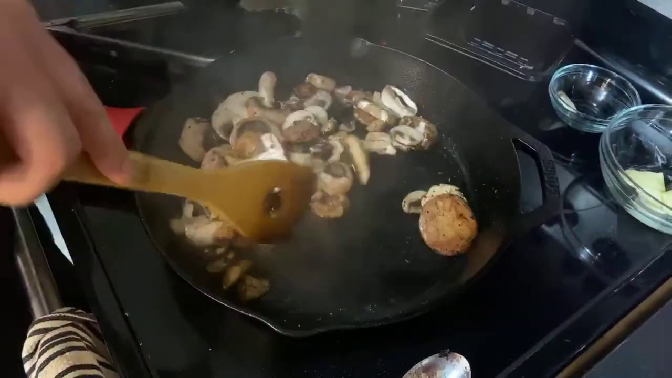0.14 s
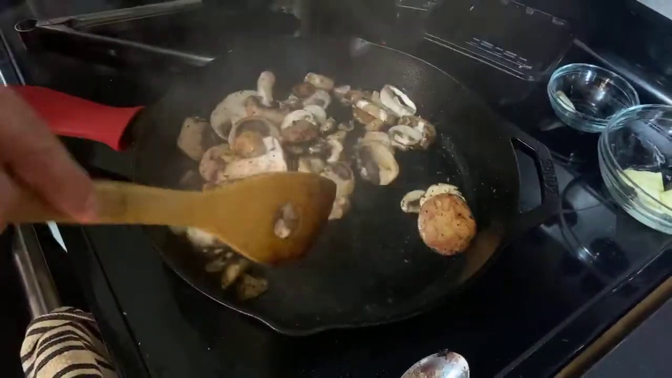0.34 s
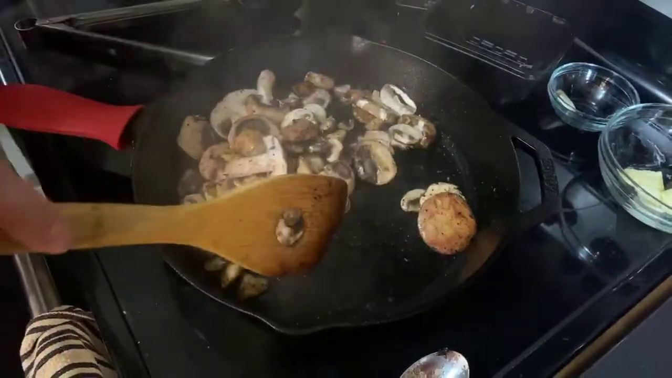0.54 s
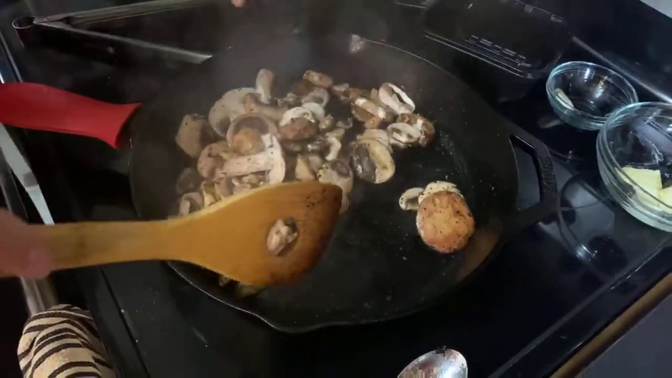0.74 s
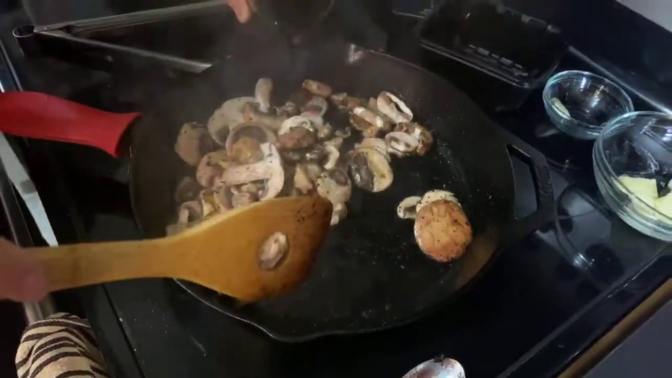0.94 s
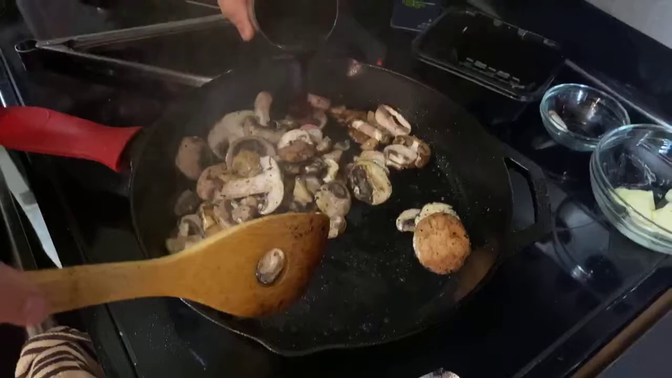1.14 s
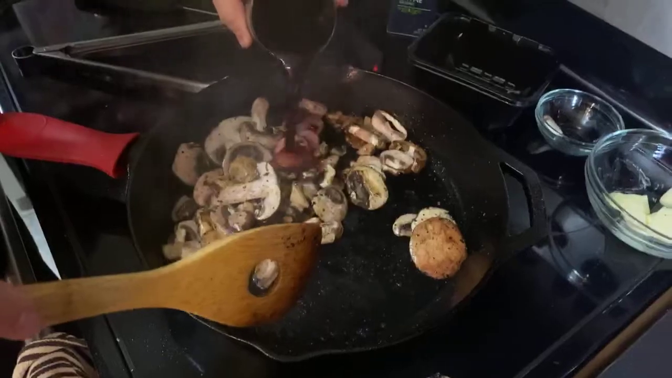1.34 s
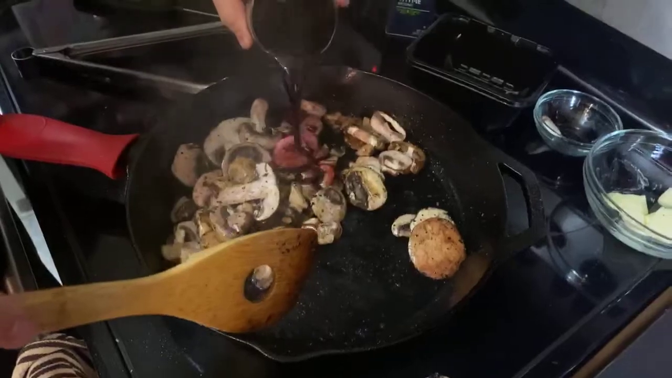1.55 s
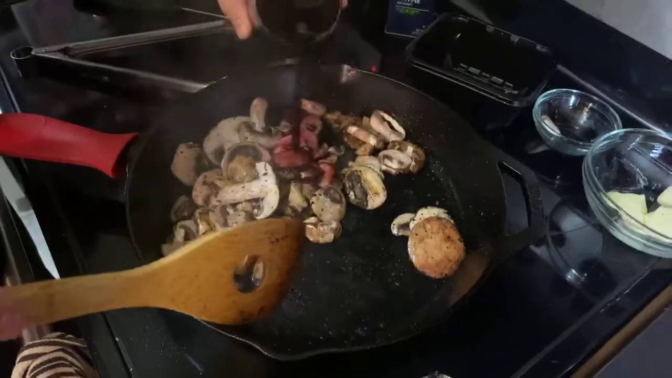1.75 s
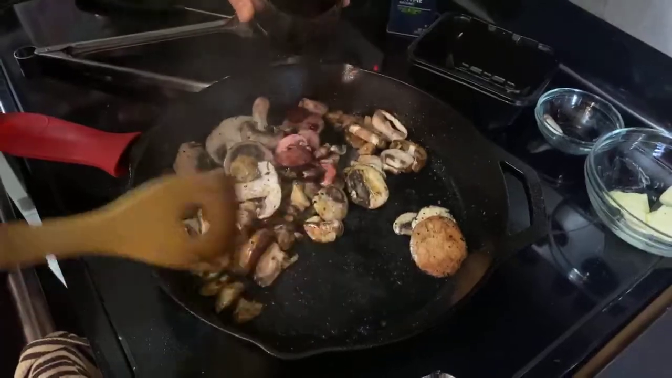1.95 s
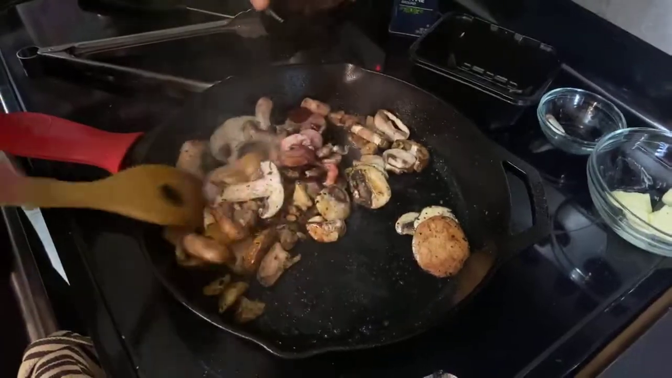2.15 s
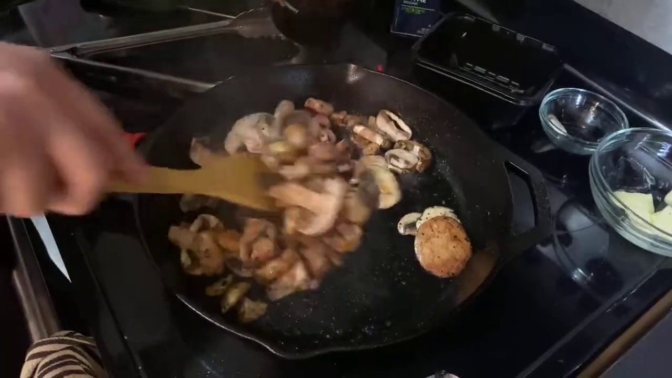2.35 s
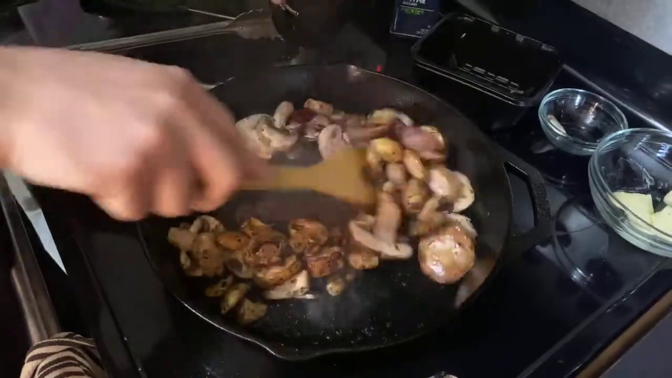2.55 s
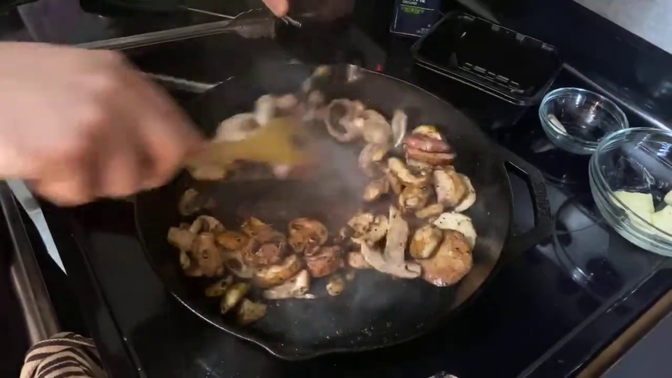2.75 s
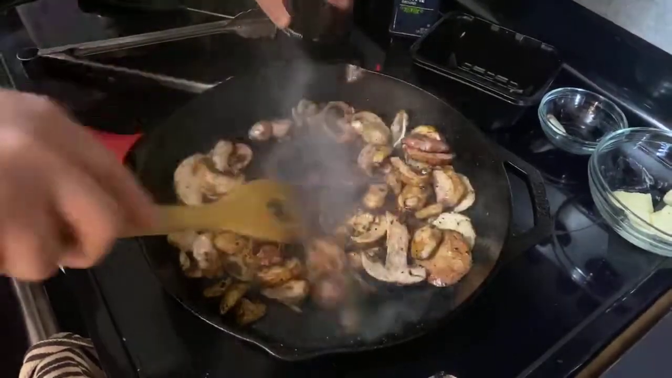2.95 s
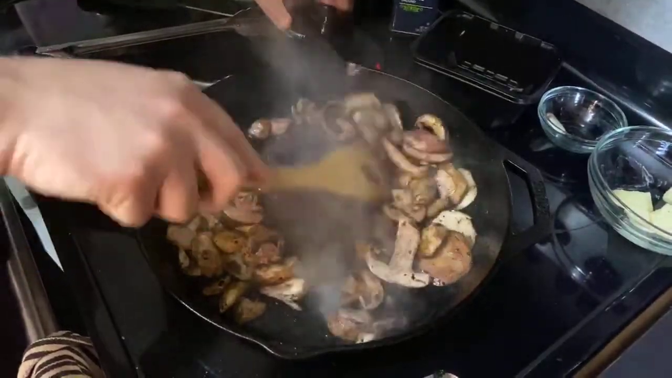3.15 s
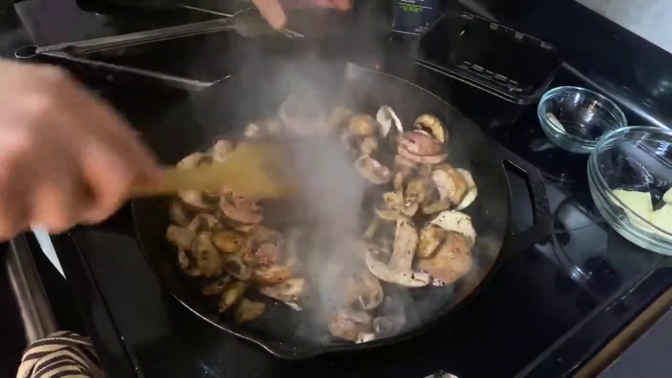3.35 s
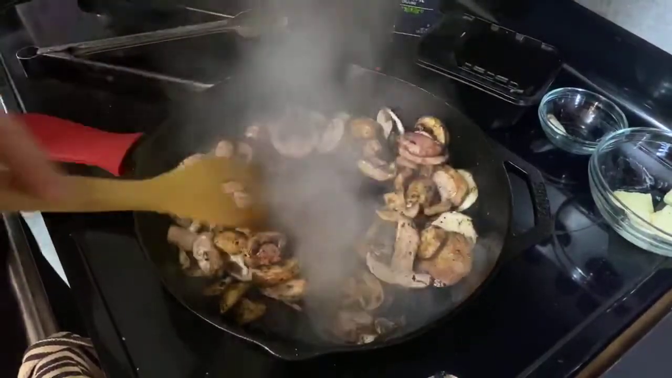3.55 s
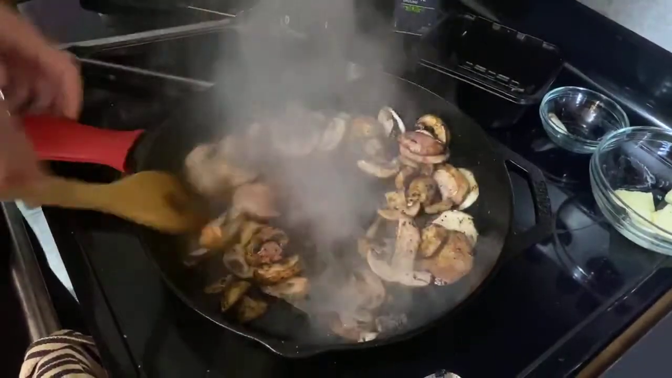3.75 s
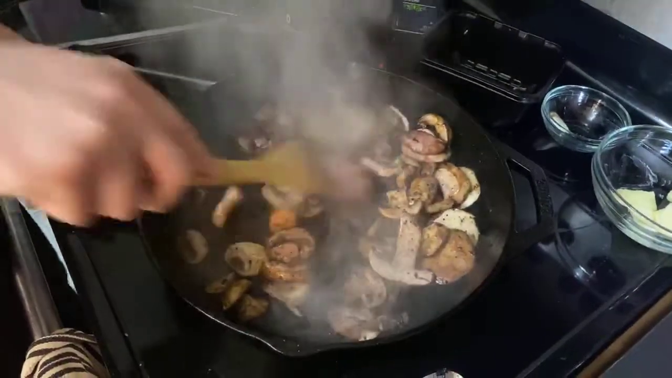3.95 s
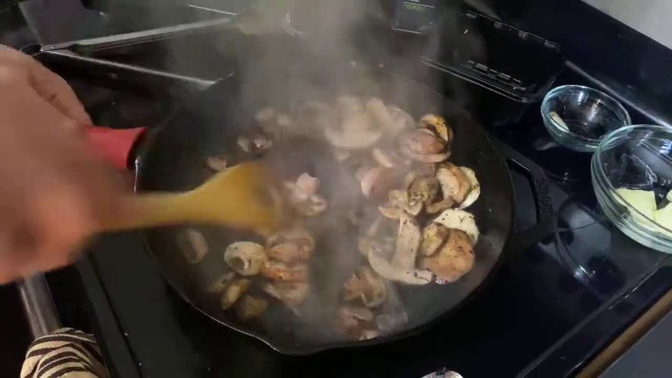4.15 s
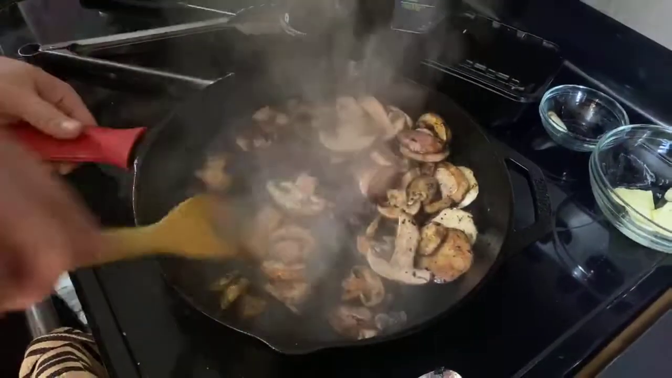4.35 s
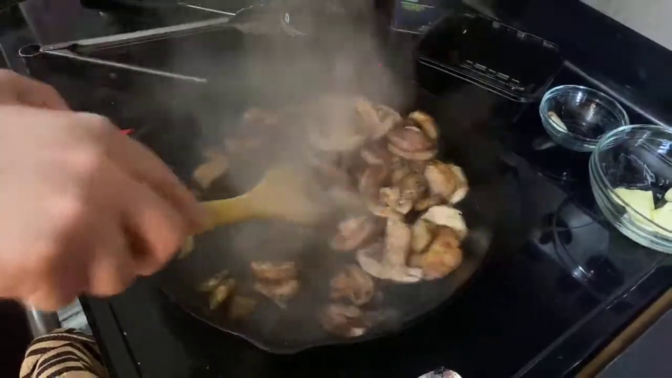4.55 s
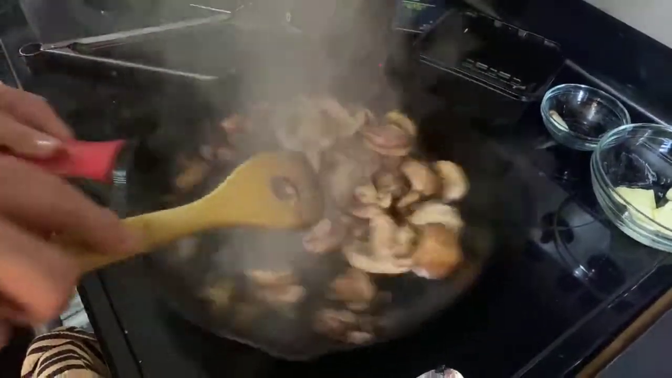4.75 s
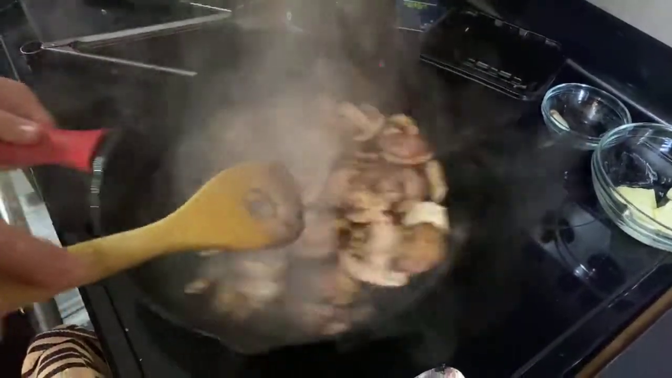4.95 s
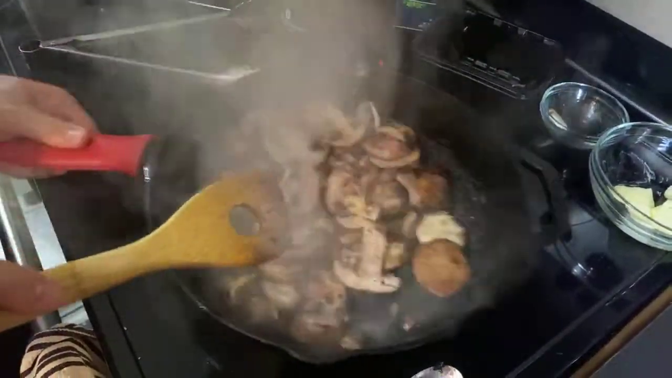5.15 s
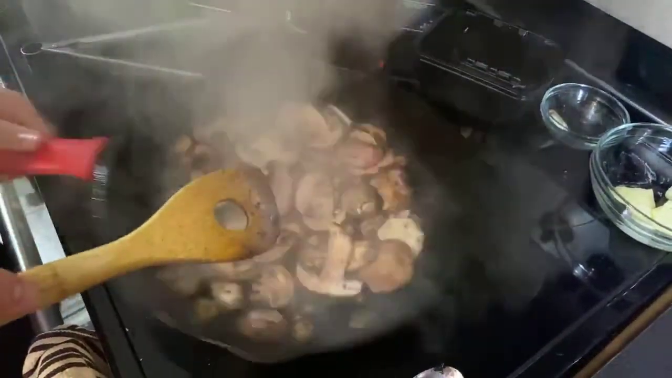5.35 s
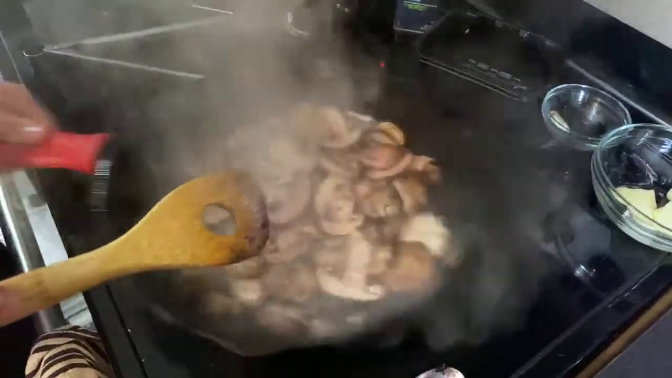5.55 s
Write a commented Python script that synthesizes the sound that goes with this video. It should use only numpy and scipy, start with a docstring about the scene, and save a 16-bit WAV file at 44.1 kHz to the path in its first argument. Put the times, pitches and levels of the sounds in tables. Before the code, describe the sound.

Mushrooms fry in a cast iron skillet, heard close from just above the stove, over a faint, low kitchen hum. The sizzle flares briefly at the start, then settles thin and steady, with a bright spit of fat at 0.7 seconds. From about 1.3 seconds liquid boils up on the hot iron, and the sizzle swells into a loud hiss with wet, bubbling spurts, strongest around 2.5 to 3 seconds. From 2 seconds a wooden spatula stirs with a soft, low rub, its strokes making the sizzle flare. At 3 seconds it hits the pan hard: a crack and thud with a brief iron ring. Fat ticks sharply around 3.5 and 4.5 seconds, and four lighter knocks fall between 3.8 and 4.8 seconds. The hiss surges again from about 5 seconds and continues to the end, a little past 5.5 seconds.

```python
"""A kitchen, just above the stove: mushrooms fry in a cast iron skillet. Liquid is poured in and boils up,
so the thin sizzle of bursting bubbles swells to a loud hiss, with wet spurts and the odd spit of fat.
Each stroke of a wooden spatula turns wet faces onto the iron, which makes the sizzle flare; it also
knocks the pan, once hard. A low kitchen hum lies underneath."""
import sys
import numpy as np
from scipy import signal
from scipy.fft import rfft, irfft, next_fast_len
from scipy.io import wavfile
from scipy.ndimage import map_coordinates

SR = 44100
rng = np.random.default_rng(int(sys.argv[2]) if len(sys.argv) > 2 else 0)


def persist_wave(psi):
    """Save psi, clipped to +-1, as 16-bit WAV."""
    counts = np.round(np.clip(psi, -1, 1) * 32767).astype(np.int16)
    wavfile.write(sys.argv[1], SR, np.atleast_2d(counts).T)


N = 247401

# Tone curves of the sizzle's three layers. Each row: frequency in Hz, relative gain in dB.
BOIL_EQ = [(25, -70), (150, -38), (350, -31.5), (700, -22.5), (1000, -10), (1400, -9), (1800, -5.5),
           (2250, -1), (2700, -3), (3000, -6), (5000, -6.5), (9000, -37)]
HISS_EQ = [(100, -75), (900, -20.5), (2200, -7.5), (3200, -9), (4000, -8), (4700, -2.5), (5700, -1),
           (6600, -4), (7600, -8), (8600, -8), (10500, -15), (15500, -48)]
SPRAY_EQ = [(100, -57), (1200, -11), (3000, -11.5), (6000, -1.5), (8600, 2.5), (11000, 0.5), (12800, 3),
            (14300, 0), (15800, 1)]
# Resonances of the pan and the hob recess. Each row: centre in Hz, width in Hz, boost in dB.
PAN_RESONANCES = [(527.7, 62, 10.5), (608, 14, 13), (780.5, 52, 9.5), (946, 15, 6), (1103, 78, 4.5),
                  (1240, 70, 6), (1453, 26, 5), (1655, 61, 4), (1900, 38, 4), (2420, 75, 2),
                  (3267, 100, 3.5), (3870, 44, 4.6), (4330, 93, 1.5), (5800, 100, 2)]

def frying():
    """Bubbles burst on the iron in three sizes; boil and hiss grow denser as the steam rises."""
    boil_db, hiss_db, spray_db = sizzle_levels()
    activity = np.sqrt(amp(hiss_db - hiss_db.max()))
    surge = wobble(12)  # steam escapes unevenly from under the slices
    wash = lambda share: share * rng.standard_normal(N)  # a smooth noise wash, the kitchen's diffuse sound around the bubbles
    large = bubbles(2800 * activity, (150, 4500), life_s=0.0077, spread_db=4, size=400)
    boil = coloured(large + wash(1.2), BOIL_EQ)
    small = bubbles(9000 * activity, (1500, 11000), life_s=0.0017, spread_db=1.5, size=100)
    hiss = coloured(small + wash(1.11), HISS_EQ)
    spray = coloured(bursts(20000, spread_db=2.0) + wash(0.48), SPRAY_EQ)
    boil *= amp(boil_db + 0.35 * surge + 0.66 * wobble(21.47))
    hiss *= amp(hiss_db + 0.22 * surge + 0.49 * wobble(25))
    spray *= amp(spray_db + 0.27 * surge + 0.47 * wobble(25.15))
    pan_db = lambda hz: sum(db / (1 + (2 * (hz - centre) / width) ** 2)
                            for centre, width, db in PAN_RESONANCES)
    return filtered(boil + hiss + spray, lambda hz: amp(pan_db(hz)))


# Liquid meets hot iron, poured in and then spread about. Each row: start, spreading time and
# boil-off time in seconds, then boil, hiss and spray levels in dB.
LIQUID_ON_IRON = [(1.33, .7, 2.85, -32, -27, -35.5), (2.16, .36, 9.7, -41, -38, -29),
                  (3.13, .25, .42, -46.5, -26.5, -42.5)]
# Spatula moves, heard as a flare here and as a rub in stirring().
# Each row: start and length in seconds, rub level in dB, flare level in dB.
SPATULA_STROKES = [(0, 0.053, -57, -33.5), (2.069, .35, -53, -35.5), (2.44, 0.53, -54, -31.5),
                   (3.06, 0.51, -52.5, -41), (3.68, .22, -50, -31.5), (3.908, 0.082, -47, -41),
                   (4.22, 0.095, -46.5, -35), (4.5, .39, -49, -34), (4.9, .31, -49.5, -28.5),
                   (5.3, .15, -51, -28), (5.48, .1, -47.5, -40.5)]
FAT_ALONE_DB, FLARE_MIX_DB = (-43.5, -37, -36), (-12.5, -1.62, 0)  # each: boil, hiss, spray
FLARE_FADE_S = 0.14  # freshly turned wet faces dry on the iron

def sizzle_levels():
    """Boil, hiss and spray in dB: steady frying, a swell with each wetting, a flare with each stroke."""
    power = np.outer(amp(FAT_ALONE_DB) ** 2, np.ones(N))
    for s, spread_s, boil_off_s, *levels_db in LIQUID_ON_IRON:
        wet = (1 - np.exp(-since(s) / spread_s)) * np.exp(-since(s) / boil_off_s)
        power += np.outer(amp(levels_db) ** 2, wet)
    for s, length, _, flare_db in SPATULA_STROKES:
        turned = np.minimum(since(s) / length, 1) * np.exp(-since(s + length) / FLARE_FADE_S)
        power += np.outer((amp(flare_db) * amp(FLARE_MIX_DB)) ** 2, turned)
    return 10 * np.log10(power)


# Spurts of wet bubbles. Each row: middle and half length in seconds, level in dB, centre pitch in Hz.
WET_SPURTS = [(.72, 0.29, -46, 2830), (1.362, 0.095, -44, 2630), (1.93, 0.35, -38.5, 4020),
              (2.227, 0.22, -37.5, 2400), (2.558, 0.093, -33, 2470), (2.69, .23, -39.5, 4000),
              (2.93, 0.41, -40.3, 2450), (3.72, 0.079, -37, 3280), (4.298, 0.14, -39.5, 2390),
              (5.2, .12, -41, 2390)]

def sputter():
    """Wet bubbles come in spurts that swell and die; each spurt's bubble size sets its pitch."""
    t = np.arange(N) / SR
    swells = np.array([amp(db) ** 2 * np.exp(-((t - s) / half) ** 2) for s, half, db, _ in WET_SPURTS])
    power = swells.sum(axis=0)
    # where spurts overlap, the stronger one supplies more of the bubbles
    spurt = np.argmax(np.cumsum(swells, axis=0) >= rng.random(N) * power, axis=0)
    centre_hz = np.array([hz for *_, hz in WET_SPURTS])[spurt]
    wet = bubbles(1800, (0.88 * centre_hz, 1.103 * centre_hz), life_s=0.0049, spread_db=3.5, size=440)
    return wet * np.sqrt(power) * amp(1.1 * wobble(22.45))


# Single drops of fat. Each row: start in seconds, peak level in dB.
FAT_SPITS = [(.691, -18), (3.516, -13), (3.614, -16), (4.513, -15.5)]

def spits():
    """Now and then a larger drop bursts with a short bright tick."""
    track, t = np.zeros(N), np.arange(SR // 50) / SR
    for s, db in FAT_SPITS:
        tick = np.diff(rng.standard_normal(len(t) + 1)) * decay(t, t60=0.0048)
        add(track, s, amp(db) * tick / np.abs(tick).max())
    return track


# The spatula hits the pan. Each row: start in seconds, thud level in dB, hard contact level in dB.
SPATULA_KNOCKS = [(2.980, -14, -16), (2.994, -42, -21), (3.787, -35, -61), (3.945, -43, -43),
                  (4.262, -34, -31), (4.546, -39, -41), (4.829, -41, -51)]
# The iron ringing, and the skillet rocking on the hob.
# Each row: pitch in Hz, relative level in dB, seconds to fall by 60 dB.
IRON_MODES = [(605, -35, 0.5), (775, -18, 0.18), (970, -35, 0.12), (1320, -2, 0.041), (1365, -14, 0.099),
              (1880, -6, 0.056), (1976, -4, 0.07), (2330, -24, .11)]
THUD_MODES = [(131, -25, 0.14), (166, -7, 0.1), (201, -2, 0.047), (246, -4.5, 0.067)]

def knocks():
    """Wood cracks on the iron, the rim rings briefly, and the heavy pan thuds and judders on the hob."""
    track, t = np.zeros(N), np.arange(SR // 2) / SR
    for s, thud_db, contact_db in SPATULA_KNOCKS:
        click = amp(-5) * band_noise([2000, 6500], len(t)) * decay(t, t60=0.026)  # wood's first touch
        crack = band_noise([700, 7000], len(t)) * decay(t, t60=0.053)
        add(track, s, amp(contact_db) * (0.5 * ring(IRON_MODES, t) + 0.74 * crack + click))
        judder = band_noise([220, 750], len(t)) * decay(t, t60=0.29)
        thud = (ring(THUD_MODES, t) + 0.18 * judder) * (1 - np.exp(-t / 0.0028))
        add(track, s + 0.0038, amp(thud_db) * thud)  # the pan answers a moment after the contact
    # the blows carry no deep bass below about 100 Hz
    return signal.sosfilt(signal.butter(4, 100, "high", fs=SR, output="sos"), track)


# Tone curve of the rub through the pan. Each row: frequency in Hz, relative gain in dB.
RUB_EQ = [(25, -36), (60, -7), (110, -1.5), (175, 0.5), (250, -2.5), (370, 0.5), (470, -2), (700, -3.5),
          (1500, -4.5), (4000, -48)]
RUB_ATTACK_S, SETTLE_S = 0.018, 0.071  # the slices start to slide, and come to rest after a stroke

def stirring():
    """During each stroke soft slices tumble and the wooden edge rubs: a low, grainy rumble."""
    power = np.zeros(N)
    for s, length, rub_db, _ in SPATULA_STROKES:
        sliding = (1 - np.exp(-since(s) / RUB_ATTACK_S)) * np.exp(-since(s + length) / SETTLE_S)
        power += amp(rub_db) ** 2 * sliding
    rumble = coloured(bursts(700, spread_db=-0.5), RUB_EQ)
    return rumble * np.sqrt(power) * amp(1.1 * wobble(18))


# The kitchen's reverb. Each row: frequency in Hz, seconds to fall by 60 dB.
KITCHEN_DECAY = [(150, 0.39), (600, 0.28), (2500, 0.069), (12000, 0.095)]

def kitchen_echo(x):
    """Reflections from hob and walls, 5 ms late; the treble dies first."""
    hz, t, noise = signal.stft(rng.standard_normal(SR // 2), SR, nperseg=256)
    tail = signal.istft(noise * decay(t, along(KITCHEN_DECAY, hz)[:, None]), SR, nperseg=256)[1]
    return signal.fftconvolve(x, np.pad(tail / np.linalg.norm(tail), (SR // 200, 0)))[:N]


# Tone curve of the room tone. Each row: frequency in Hz, relative gain in dB.
HUM_EQ = [(20, -37), (50, -13.5), (90, -4), (118, 3), (140, -2.5), (200, -2), (300, -1), (370, 0),
          (440, -12), (570, -2.5), (700, -14), (1000, -18), (1130, 8.5), (1400, -9.5), (4000, -22)]

def hum():
    """Steady air noise of the kitchen: a low rumble with a faint hollow note near 1.1 kHz."""
    return amp(-53.0) * coloured(rng.standard_normal(N), HUM_EQ)


def bubbles(per_second, pitch_hz, life_s, spread_db, size):
    """Bursting bubbles at steady rms 1: each rings for size samples and glides up in pitch."""
    start = np.flatnonzero(rng.random(N) < per_second / SR)
    low_hz, high_hz = (np.broadcast_to(edge, N)[start, None] for edge in pitch_hz)
    place, strength, phase = rng.random((len(start), 3)).T[:, :, None]
    t = np.arange(size) / SR
    cycles = (low_hz + place * (high_hz - low_hz)) * (t * (1 + 8 * t))
    fade = np.exp(-t / life_s) * (1 - t / t[-1]) * (1 - np.exp(-t / 0.000095))
    grain = amp(spread_db * strength ** 2) * fade * np.sin(2 * np.pi * (cycles + phase))
    cloud = np.bincount((start[:, None] + np.arange(size)).ravel(), grain.ravel(), N)[:N]
    return unit(cloud / np.sqrt(per_second))


def bursts(per_second, spread_db):
    """Random tiny impulses of uneven size, at rms 1."""
    happens = rng.random(N) < per_second / SR
    size_db = spread_db * np.minimum(rng.standard_normal(N), 3)
    return unit(happens * amp(size_db) * rng.choice([-1, 1], N))


def ring(modes, t):
    """Damped modes, at slightly new strengths for every blow."""
    return sum(amp(db + rng.normal(0, 1)) * decay(t, t60) * np.sin(2 * np.pi * hz * t)
               for hz, db, t60 in modes)


def band_noise(edges_hz, size):
    """Noise of rms 1 between two frequencies."""
    band = signal.butter(3, edges_hz, "band", fs=SR, output="sos")
    return unit(signal.sosfilt(band, rng.standard_normal(size)))


def wobble(rate):
    """A smooth random curve, rate knots a second."""
    return map_coordinates(rng.standard_normal(int(N * rate / SR) + 4), [np.arange(N) * rate / SR])


def coloured(x, curve):
    """x through a tone curve, at rms 1."""
    return unit(filtered(x, lambda hz: amp(along(curve, hz))))


def filtered(x, response):
    """x through a gain that depends on frequency."""
    size = next_fast_len(N + SR // 2)
    return irfft(rfft(x, size) * response(np.fft.rfftfreq(size, 1 / SR)), size)[..., :N]


def along(points, hz):
    """(Hz, value) points read on a log axis."""
    points_hz, values = np.transpose(points)
    return np.interp(np.log(hz + 1), np.log(points_hz + 1), values)


def amp(db):
    """Decibels to gain."""
    return 10 ** (np.asarray(db) / 20)


def decay(t, t60):
    """A fade of 60 dB every t60 seconds."""
    return amp(-60 * t / t60)


def unit(x):
    """Scale to rms 1."""
    return x / np.sqrt(np.mean(x ** 2) + 1e-20)


def since(s):
    """Seconds since time s for every sample, zero before it."""
    return np.maximum(np.arange(N) / SR - s, 0)


def add(track, s, sound):
    """Mix a sound into the track at time s."""
    start = round(s * SR)
    track[start:start + len(sound)] += sound[:N - start]


def scene():
    """The pan from above, the same in both ears; spatters and blows stand out enough to echo."""
    spatter, blows = sputter() + spits(), knocks()
    echo = kitchen_echo(amp(-5.5) * spatter + amp(-14.5) * blows)
    mono = frying() + spatter + blows + echo + stirring() + hum()
    return np.array([mono, mono])


def record(dry):
    """A hard high cut takes off the very top of the sizzle."""
    return filtered(dry, lambda hz: hz < 15800)


dry = scene()
out = record(dry)
persist_wave(out)
```